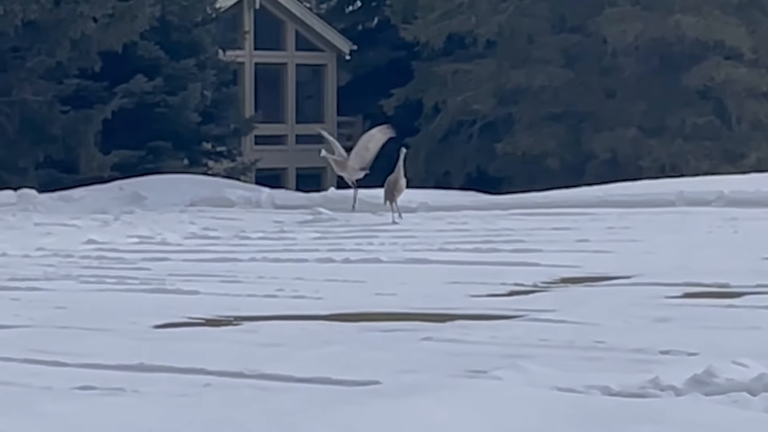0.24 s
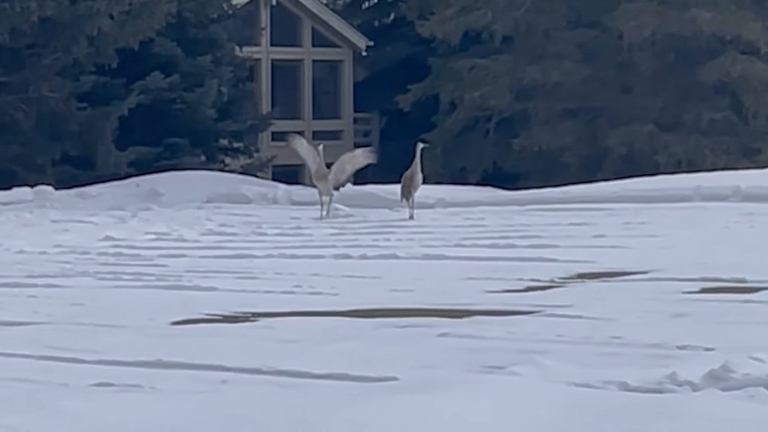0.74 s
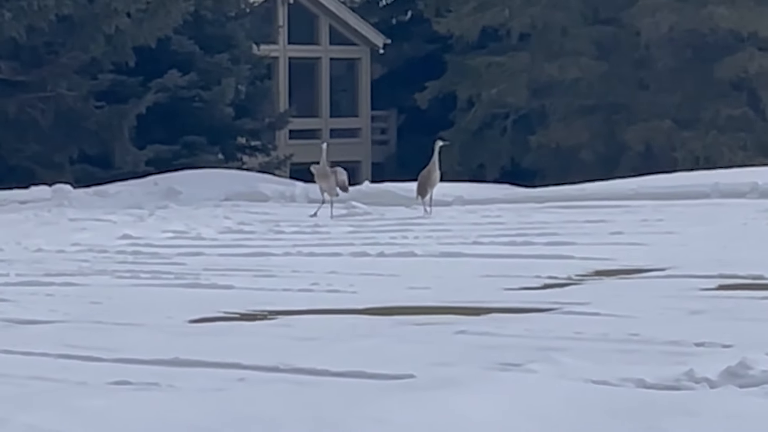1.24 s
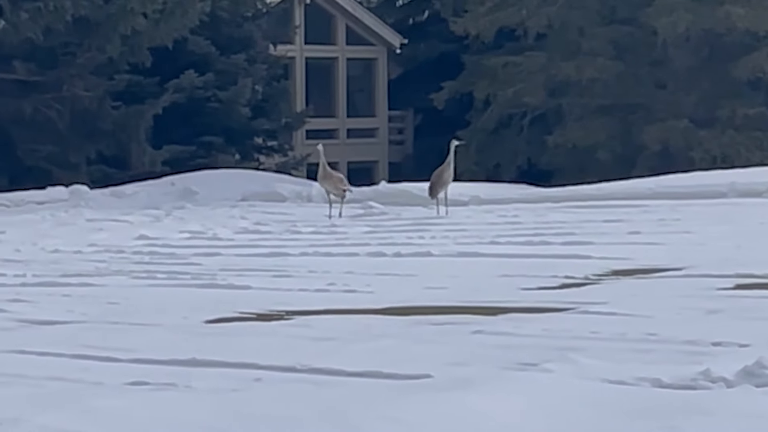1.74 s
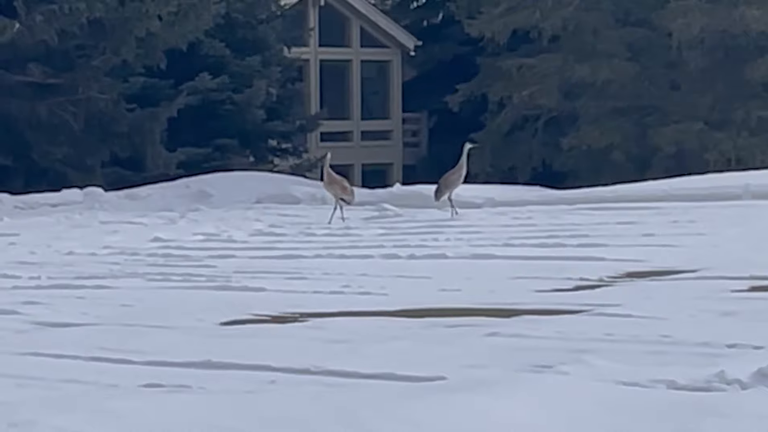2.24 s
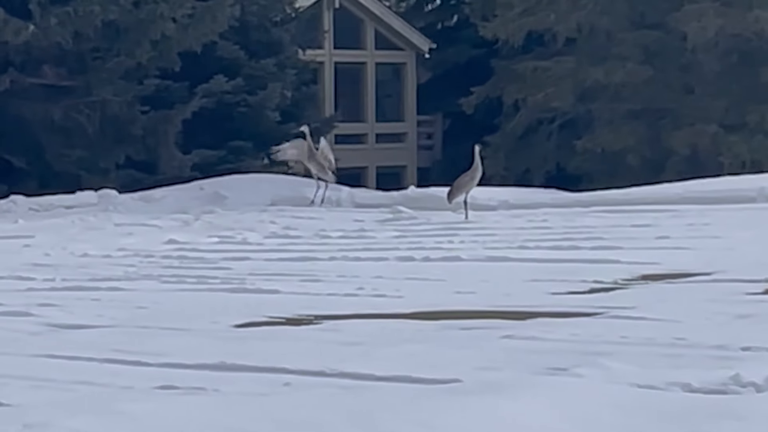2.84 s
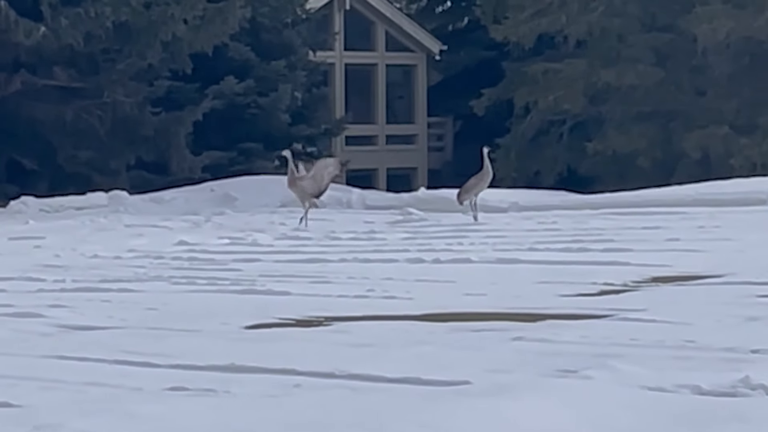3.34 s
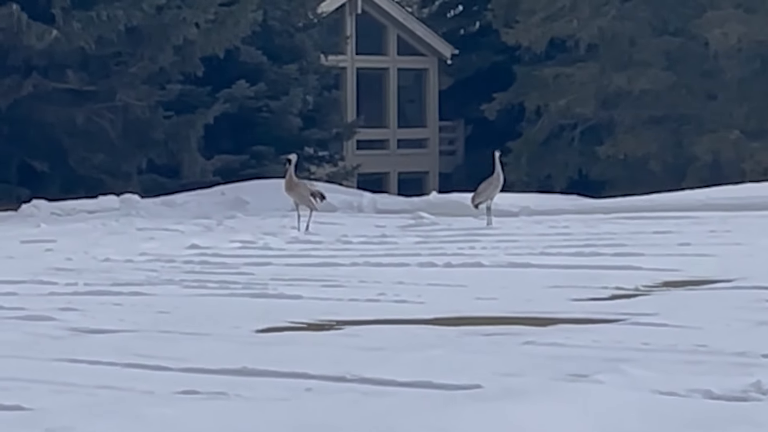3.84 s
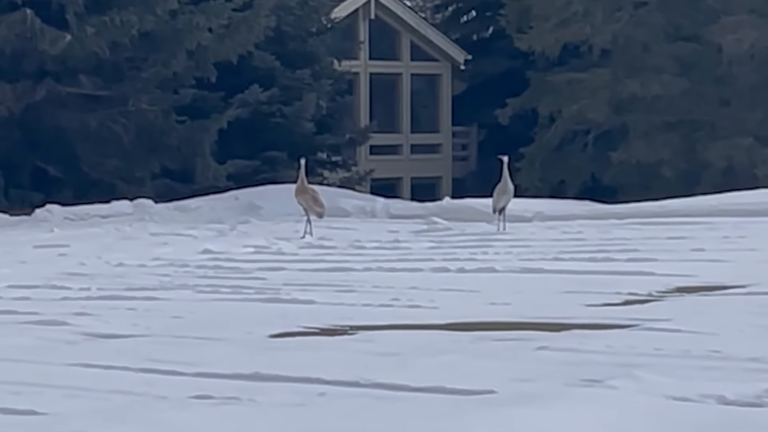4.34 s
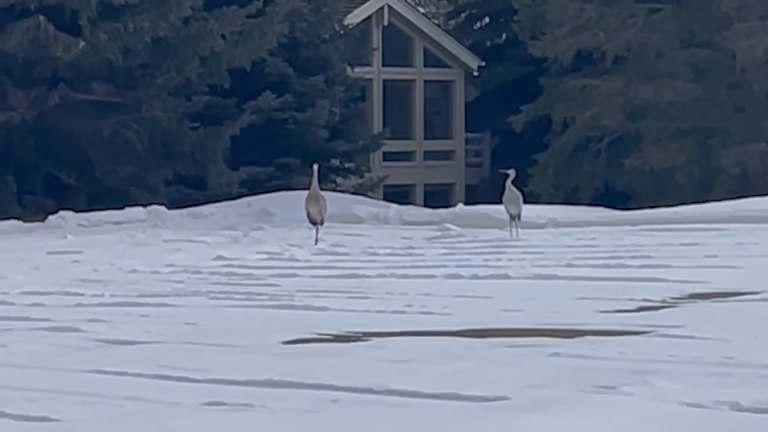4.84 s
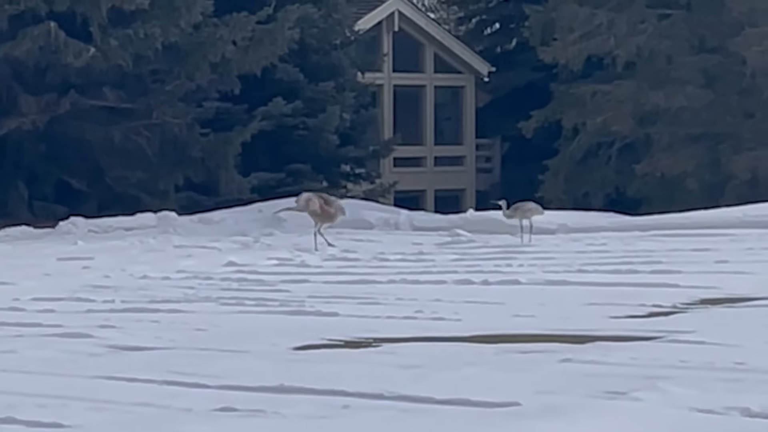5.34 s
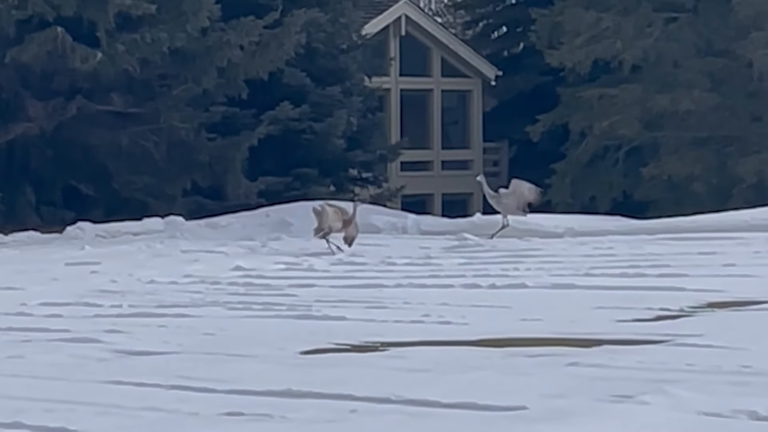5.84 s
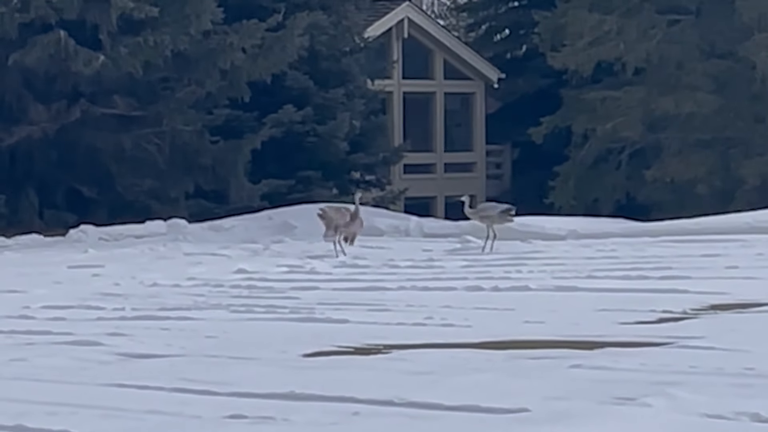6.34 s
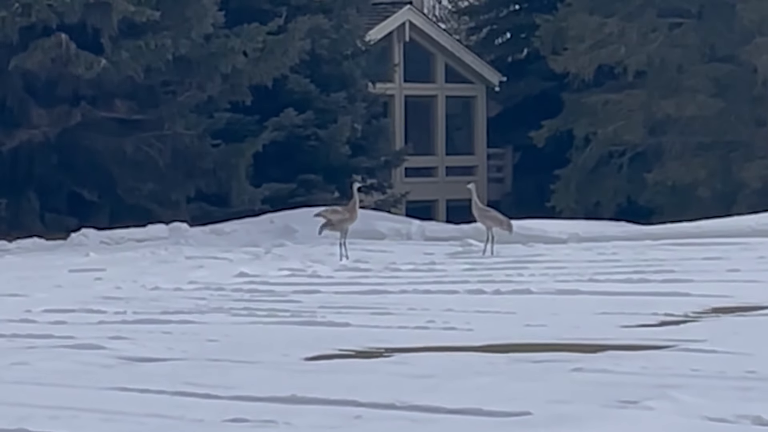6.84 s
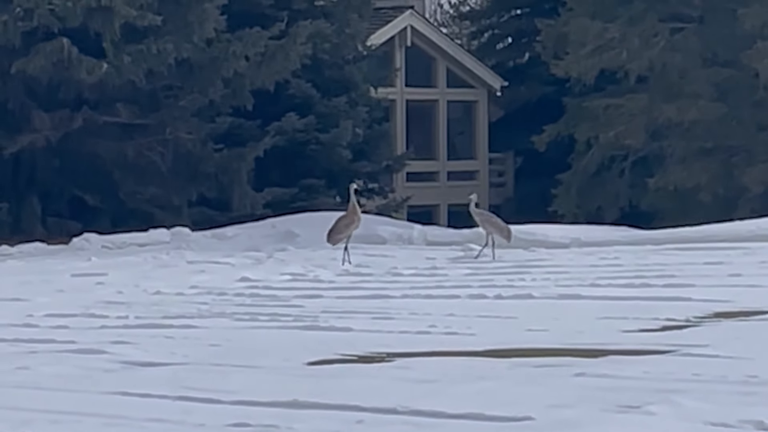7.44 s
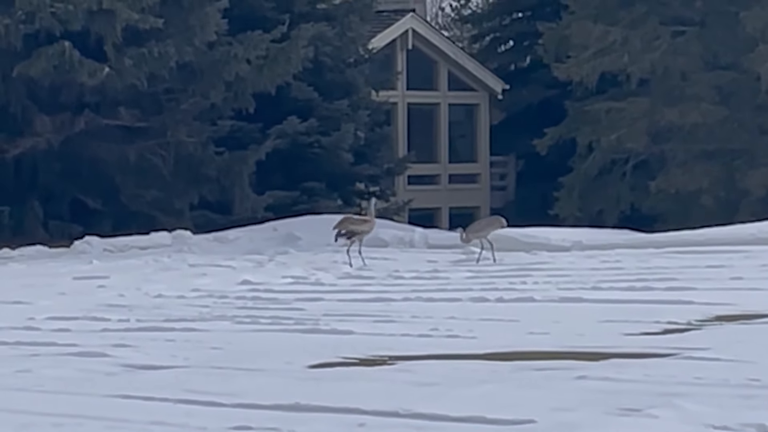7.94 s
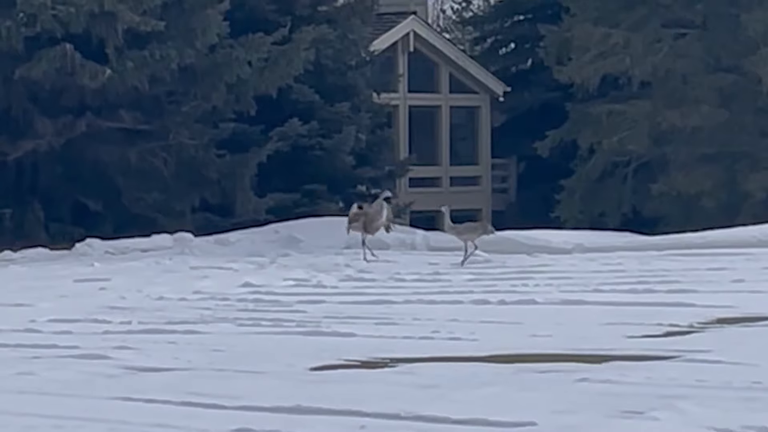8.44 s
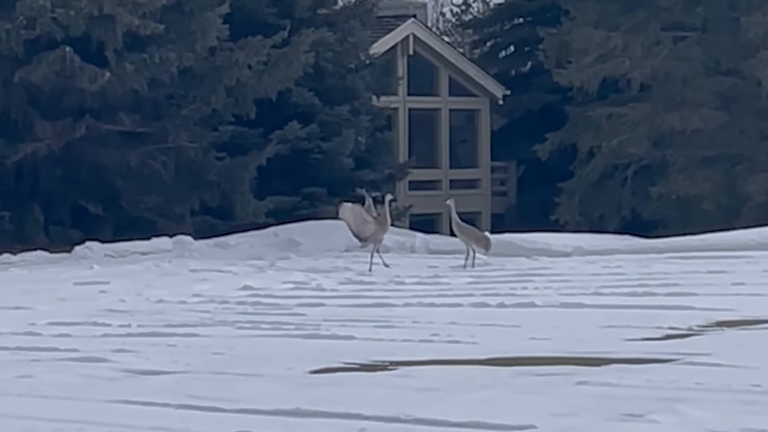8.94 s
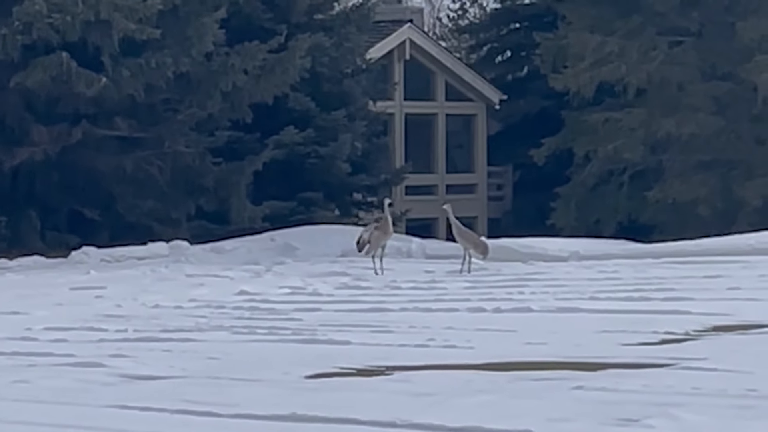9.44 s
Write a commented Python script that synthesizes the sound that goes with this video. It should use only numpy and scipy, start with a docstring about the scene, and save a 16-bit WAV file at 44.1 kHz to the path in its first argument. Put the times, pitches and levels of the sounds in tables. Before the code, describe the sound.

A pair of cranes some way off gives four fast, wooden, trumpeting rattles, the first already under way at the start. Each speeds up, then sags and fades within half a second, leaving a slap echo and a thin woodland tail. Between calls there is muffled outdoor rumble, a swelling hum, two dull soft bumps, faint thin bird whistles and a far engine that revs and drones. The handheld microphone has slightly dulled treble.

```python
"""Two sandhill cranes give four rattling duets on a snowy field; two soft notes mark the start of the last three.
One bird rolls short falling bugle notes, the other answers with lower, harsh double clacks. Each roll speeds up
and tires. Both voices are rich harmonic waves with rough air noise, shaped by throat filters and short bursts.
A house and a forest edge echo them. Behind are an outdoor rush of filtered noise, a low humming sine,
faint songbird whistles, two soft bumps, and a far engine of a few harmonics that revs up and drones on."""
import sys
import numpy as np
from scipy import signal
from scipy.fft import rfft, irfft, next_fast_len
from scipy.io import wavfile
from scipy.ndimage import uniform_filter1d

SR = 44100
rng = np.random.default_rng(int(sys.argv[2]) if len(sys.argv) > 2 else 0)


def wav_out(sig):
    """Save sig, one row per channel (or a flat mono array), as 16-bit PCM at SR to the path in sys.argv[1]."""
    wavfile.write(sys.argv[1], SR, np.round(np.clip(np.atleast_2d(sig).T, -1, 1) * 32767).astype(np.int16))


N = 427759  # length in samples, about 9.7 seconds

# Levels in dB are set before the microphone.
# Colour of the outdoor rush. Each row: frequency in Hz, gain in dB.
RUSH_COLOUR = [(20, -33), (35, -4.5), (52, 5.5), (75, 1), (150, -4), (300, -4), (550, -5), (900, -1.5),
               (1300, -9), (2000, -19), (3200, -27), (5000, -40), (7000, -48.5), (12000, -53)]
RUSH_DB = -44.5
# Deep rumble under the rush. Each row: time in seconds, gain in dB.
RUMBLE_GAIN = [(0, 0.5), (6.3, 2.5), (7.2, 1), (9.7, -9)]
# Low hum: its pitch, its resting level, and the time and level of its one swell.
HUM_HZ = 63
HUM_REST_DB, HUM_PEAK_S, HUM_PEAK_DB = -58, 3.75, -44.5
HUM_RISE_DB_PER_S, HUM_FALL_DB_PER_S = 5, 10.5

# Rolls of the lead crane. Each row: start in seconds, settled note spacing in seconds, level in dB before tiring,
# base pitch in Hz (each note glides around it), treble gain in dB at 4500 Hz, drop of the last note in dB.
BUGLE_ROLLS = [(-0.1668, .0472, -26.1, 980, -3, 11), (2.9415, .0452, -26, 1002, 5.8, 7),
               (5.7761, .047, -27.3, 992, .3, 3.5), (8.5528, .0461, -29.6, 970, -2.5, 4.5)]
# A roll starts slowly: the first gap is longer, and this lag dies away within a few notes.
BUGLE_LAG_S, BUGLE_SETTLE_NOTES = .022, 1.5
# Rolls of its mate. Each row: start in seconds, number of notes, first gap in seconds, shortening of each gap in
# seconds, level in dB before fading, starting treble gain in dB at 4500 Hz, drop of the last note in dB.
CLACK_ROLLS = [(0.0245, 7, .0634, .0038, -29.9, 2.8, 7.5), (3.1149, 9, .0729, .0052, -28.5, -1, 6),
               (5.9205, 9, .0751, .0052, -29.1, .2, 8.5), (8.7051, 7, .0756, .0066, -29.3, 0, 1.5)]
# Windpipe and bill colour of each kind of note. Each row: frequency in Hz, gain in dB.
BUGLE_THROAT = [(450, -24.5), (750, -1), (1020, -1.5), (1400, -3), (2100, -9.5), (2550, -15.5),
                (3200, -24.5), (4200, -15), (5400, -22.5), (6700, -23.5), (10000, -34.5), (13000, -38)]
CLACK_THROAT = [(380, -30), (560, -6), (730, 5), (1050, -3), (1400, -1.5), (1850, -3), (2450, -8.5),
                (3100, -7), (3900, -13), (5000, -9), (6500, -18.5), (10000, -28), (13000, -39)]
PEEP_THROAT = [(600, -11), (1250, 3.5), (1950, 0), (2500, -15), (3200, -6), (3900, -19), (4500, -13.5),
               (5500, -24.5), (7000, -34), (12000, -47)]
# Soft crane notes around the start of a roll. Each row: start in seconds, length in seconds,
# start, middle and end pitch in Hz, level in dB, roughness from 0 to 1.
PEEPS = [(2.815, 0.046, 507, 604, 572, -35.5, .2), (2.987, 0.026, 564, 579, 550, -31, 0.45),
         (5.632, 0.058, 602, 653.6, 618, -34.5, 0.28), (5.795, 0.044, 546, 555, 527, -33, .25),
         (8.419, 0.046, 587, 625, 588, -39.5, 0.35), (8.581, 0.049, 560, 574, 530, -30.5, 0.87)]
# The birds turn, so the house front catches more or less of their calls. Each row: time in seconds, gain in dB.
FACING_HOUSE = [(.3, 0.5), (3.5, 4), (6.3, -3.5), (9.0, -6)]

# Songbird slurs. Each row: start in seconds, length in seconds, start, middle and end pitch in Hz,
# level in dB before flicker.
SLURS = [(1.52, .11, 6400, 4600, 5200, -66), (1.63, 0.043, 5900, 5000, 4400, -73),
         (2.65, 0.082, 5500, 4730, 4260, -70), (2.75, 0.079, 5400, 4380, 3920, -70.5)]
# Runs of repeated songbird notes. Each row: first note in seconds, end of the run in seconds, spacing in seconds,
# start, middle and end pitch in Hz, level in dB before scatter and flicker.
SONGS = [(4.871, 5.6, .143, 2103, 2500, 2340, -67), (6.559, 8.6, 0.13, 2030, 2525, 2390, -64),
         (6.949, 7.75, 0.099, 4030, 3800, 3600, -73.5)]
# Soft low bumps. Each row: start in seconds, level in dB before the decay shape, decay in seconds.
BUMPS = [(2.331, -60, 0.041), (4.776, -41, 0.044)]

# Far engine. Each row: time in seconds, firing rate in Hz, level in dB before the exhaust colour.
ENGINE = [(2.9, 77, -62), (3.24, 75, -48.5), (3.778, 65, -42), (4.03, 102, -47.5), (4.15, 108.5, -47),
          (4.45, 107, -60), (5.0, 100, -65), (5.401, 99.5, -51.5), (6.35, 101.3, -47), (6.75, 101.5, -51.5),
          (7.048, 101, -64), (7.4, 101.3, -51.5), (8.102, 102.3, -49), (8.35, 103.2, -45.5),
          (9.1, 107, -46.5), (9.7, 109.3, -48)]
# Colour of its exhaust, with two narrow pipe resonances. Each row: frequency in Hz, gain in dB.
EXHAUST = [(65, -2), (80, 1), (102, -3), (108, -1), (140, -2), (201, -4), (207, 4), (215, -1), (300, -17.5),
           (392, -15.5), (407, -3.5), (420, -12.5)]
# Off throttle the upper harmonics are weak; they open up between these firing rates.
IDLE_HZ, OPEN_HZ, IDLE_DULL_DB = 76, 82, -17

# Left-right balance of the microphone ports. Each row: frequency in Hz, left minus right in dB.
PORT_BALANCE = [(120, 0), (350, .7), (700, 1.5), (1300, .7), (2500, .2), (5000, 0)]
# Microphone colour. Each row: frequency in Hz, gain in dB.
MIC_COLOUR = [(5500, -3.5), (6800, -7.5), (7800, -21.5), (9400, -3), (12000, -3), (14000, -23.5),
              (15500, -23)]
TOP_HZ = 15700  # the microphone passes little above this


def undb(db):
    """Turn decibels into a gain."""
    return 10 ** (np.asarray(db) / 20)


def unit(x):
    """Scale to an rms (average strength) of 1."""
    return x / np.sqrt(np.mean(x ** 2))


def clock(length_s):
    """Sample times of a short sound, in seconds."""
    return np.arange(int(length_s * SR)) / SR


def add(out, start_s, x):
    """Mix a short sound into a track."""
    i = max(int(start_s * SR), 0)
    out[i:i + len(x)] += x[:len(out) - i]


def gain_at(hz, points):
    """Read the gain from rows of Hz and dB, joined on a log-frequency axis."""
    f, db = np.transpose(points)
    return undb(np.interp(np.log(hz + 1e-3), np.log(f), db))


def colour(x, points):
    """Filter to a Hz and dB spectrum without ringing ahead of the sound, by folding its cepstrum forward."""
    size = next_fast_len(2 * len(x), real=True) // 2 * 2
    hz = np.arange(size // 2 + 1) * SR / size
    cepstrum = irfft(np.log(gain_at(hz, points)))
    cepstrum[1:size // 2] *= 2
    cepstrum[size // 2 + 1:] = 0
    response = np.exp(rfft(cepstrum))
    return irfft(rfft(x, size) * response)[:len(x)]


def wander(t, rate):
    """Random values joined by straight lines, rate of them a second."""
    grid = (t - t[0]) * rate + rng.random()
    knots = rng.standard_normal(len(t))
    return np.interp(grid, np.arange(len(knots)), knots)


def sway(hz):
    """A plain sine whose pitch follows hz."""
    return np.sin(2 * np.pi * np.cumsum(hz) / SR)


def burst(t, rise_s, fall_s):
    """Air pressure that builds quickly and runs out; its top is 1."""
    t = np.maximum(t, 0)
    shape = (1 - np.exp(-(t / rise_s) ** 2)) * np.exp(-(t / fall_s) ** 2)
    return shape / shape.max()


def rush(flutter_db=1, side_db=-21):
    """Far traffic and air in the trees: rumble, lows, middle and treble waver on their own."""
    t = np.arange(N) / SR
    bands = []
    for hz, kind in [(80, "low"), ([80, 400], "band"), ([400, 1500], "band"), (1500, "high")]:
        sos = signal.butter(2, hz, kind, fs=SR, output="sos")
        noise = signal.sosfilt(sos, rng.standard_normal(N))
        bands.append(noise * undb(flutter_db * wander(t, 11) + .5 * wander(t, 0.38)))
    deep, *upper = bands
    air = deep * undb(np.interp(t, *np.transpose(RUMBLE_GAIN))) + sum(upper)
    # opposite in the two channels, so the rush sounds wide
    side = colour(rng.standard_normal(N), [(60, -16.0), (300, 4.5), (1200, 7), (5000, 4.5)]) * undb(side_db)
    stereo = np.array([colour(air + side, RUSH_COLOUR), colour(air - side, RUSH_COLOUR)])
    return unit(stereo) * undb(RUSH_DB)


def hum(waver=0.012):
    """A low sine, slightly wavering in pitch, that swells and sinks back."""
    t = np.arange(N) / SR
    rising = HUM_RISE_DB_PER_S * (HUM_PEAK_S - t)
    falling = HUM_FALL_DB_PER_S * (t - HUM_PEAK_S)
    db = np.maximum(HUM_PEAK_DB - np.maximum(rising, falling), HUM_REST_DB)
    return np.sqrt(2) * undb(db) * sway(HUM_HZ * (1 + waver * wander(t, 4.2)))


def syrinx(hz, rasp):
    """A harmonic wave from swinging membranes, and a puff of air noise each cycle that blurs the upper harmonics."""
    phase = 2 * np.pi * np.cumsum(hz) / SR
    k = np.arange(1, 25)[:, None]  # harmonic numbers
    lags = 2 * np.pi * rng.random(k.shape)  # the long coiled windpipe delays each harmonic differently
    audible = k * hz < SR / 2
    wave = unit(np.sum(np.cos(k * phase - lags) * audible, axis=0))
    air = unit((1 + np.cos(phase)) * rng.standard_normal(len(hz)))
    wave = colour(wave, [(2100, 0), (4000, -8 * rasp)])
    return wave + rasp * colour(air, [(1000, -4), (2000, -2), (3500, 2)])


def brighten(x, treble_db):
    """A harder push lifts the upper harmonics, the highest most."""
    return colour(x, [(1700, 0.019), (4500, treble_db), (12000, 1.9 * treble_db)])


def bugle_notes(count=7, tiring_power=5.5, sag_hz_per_db=10.0, first_dull_db=3.5, scatter_db=0.75, scatter_hz=14):
    """A roll speeds up to a steady beat and brightens; as the breath runs out its notes sink in level and pitch."""
    k = np.arange(count)
    lag = np.exp(-k / BUGLE_SETTLE_NOTES)
    for start_s, gap_s, db, hz, treble_db, drop_db in BUGLE_ROLLS:
        gaps = gap_s + BUGLE_LAG_S * lag
        times = start_s + np.cumsum(gaps) - gaps
        tired_db = drop_db * (k / k[-1]) ** tiring_power
        levels = db - tired_db + scatter_db * rng.standard_normal(count)
        pitches = hz - sag_hz_per_db * tired_db + scatter_hz * rng.standard_normal(count)
        yield from zip(times, levels, pitches, treble_db - first_dull_db * lag)


def bugles(rise_s=0.0034, fall_s=0.0082, jitter=.03, opening_db=-17, closing_db=-12, closing_s=0.012, lead_s=.0022):
    """Each note flutters open, swings a dozen cycles that sag in pitch, then breaks up as the membranes close."""
    opening_s, rasp = .006, .45
    out, t = np.zeros(N), clock(.06) - opening_s
    for s, db, hz, treble_db in bugle_notes():
        if s < 0:  # the first roll is already under way
            continue
        sag = .73 + .38 * np.exp(-np.maximum(t, 0) / .017)
        pitch = hz * (sag + jitter * wander(t, 965))
        opening = undb(opening_db) * syrinx(pitch, 1) * burst(t + opening_s, 0.001, 0.011)
        voice = syrinx(pitch, rasp) * burst(t, rise_s, fall_s)
        # as the push ends only the round fundamental swings on
        ring = .15 * np.cos(2 * np.pi * np.cumsum(pitch) / SR) * burst(t, .005, .012)
        broken_pitch = pitch * (1 + 0.12 * wander(t, 600))
        closing = undb(closing_db) * syrinx(broken_pitch, 0.94) * burst(t - closing_s, 0.002, 0.0069)
        note = brighten(colour(opening + voice + ring + closing, BUGLE_THROAT), treble_db)
        add(out, s - lead_s - opening_s, unit(note) * undb(db))
    return out


def clack_notes(fade_db_per_note=0.64, harden_db_per_note=0.12, tiring_power=8, second_db=-3, second_scatter_db=1.0):
    """The answering roll quickens evenly, fades and hardens, then gives out; the second burst varies by note."""
    for start_s, count, gap_s, quicken_s, db, treble_db, drop_db in CLACK_ROLLS:
        k = np.arange(count)
        gaps = gap_s - quicken_s * k
        times = start_s + np.cumsum(gaps) - gaps
        levels = db - fade_db_per_note * k - drop_db * (k / k[-1]) ** tiring_power
        seconds_db = second_db + second_scatter_db * rng.standard_normal(count)
        yield from zip(times, levels, treble_db + harden_db_per_note * k, seconds_db)


def clacks(rasp=1.0, jitter=.05, rise_s=0.0017, first_s=0.0057, second_s=0.012, gap_s=0.0069, lead_s=.0014):
    """The membranes snap open, swing low for a few cycles, then rattle shut in a second, rougher burst."""
    gap_scatter_s = .0013
    out, t = np.zeros(N), clock(.05)
    for s, db, treble_db, second_db in clack_notes():
        detune = 1 + 0.055 * rng.standard_normal() + jitter * wander(t, 930)
        pitch = (680 + 260 * np.exp(-t / 0.00379)) * detune
        snap = syrinx(pitch, rasp) * burst(t, rise_s, first_s)
        ring = 0.13 * np.cos(2 * np.pi * np.cumsum(pitch) / SR) * burst(t, 0.003, 0.014)
        rattle = syrinx(590 * (1 + 0.113 * wander(t, 511)), 0.96)
        second_start_s = gap_s + gap_scatter_s * rng.standard_normal()
        rattle = rattle * burst(t - second_start_s, 0.0019, second_s)
        rattle = colour(rattle * undb(5.2 * wander(t, 227)), [(700, -3.5), (1700, 4.5), (4500, -5)])
        note = brighten(colour(snap + ring + undb(second_db) * rattle, CLACK_THROAT), treble_db)
        add(out, s - lead_s, unit(note) * undb(db))
    return out


def surroundings(x, house_s=.108, house_db=-17, near_db=-15.5, near_s=0.014, forest_db=-20.5,
                 forest_t60_s=1.32, patchy_db=4):
    """Scatter from the snow banks, one slap from the house front and a thin, uneven tail from the trees."""
    t = clock(1.2)
    scatter, slap, trees = rng.standard_normal((3, len(t)))
    near = scatter * np.exp(-t / near_s) * (t > .004)
    near = colour(near, [(900, -1), (3000, 1.5), (5000, 4), (10000, 1)])
    house = slap * burst(t - house_s, 0.00083, 0.004)
    house = colour(house, [(900, -5.5), (1800, 1), (3300, 2.5), (5000, -4.5), (10000, -10.5)])
    # the tail builds up softly, then falls 60 dB in forest_t60_s
    tail = (1 - np.exp(-t / 0.038)) * undb(-60 * t / forest_t60_s)
    trees = trees * undb(patchy_db * wander(t, 90)) * tail
    forest = colour(trees, [(700, -0.5), (3500, -9.0), (6000, -12.5), (10000, -16.5)])
    parts = [(near, near_db), (house, house_db), (forest, forest_db)]
    near, house, forest = (undb(db) * part / np.linalg.norm(part) for part, db in parts)
    facing = undb(np.interp(np.arange(N) / SR, *np.transpose(FACING_HOUSE)))
    return (signal.fftconvolve(x, near + forest) + signal.fftconvolve(x * facing, house))[:N]


def arch(length_s, start_hz, middle_hz, end_hz):
    """A curved pitch through three points, and a swell with soft ends."""
    u = clock(length_s) / length_s
    hz = np.polyval(np.polyfit([0, .5, 1], [start_hz, middle_hz, end_hz], 2), u)
    return hz, np.sqrt(np.sin(np.pi * u ** 1.62))


def songbirds(note_s=0.062):
    """Thin, flickering whistles from the trees: sines that glide in pitch."""
    out, notes = np.zeros(N), list(SLURS)
    for first, last, spacing, start_hz, middle_hz, end_hz, db in SONGS:
        for s in np.arange(first, last, spacing):
            note_start = s + .006 * rng.standard_normal()
            notes.append((note_start, note_s, start_hz, middle_hz, end_hz, db + rng.standard_normal()))
    for s, length_s, start_hz, middle_hz, end_hz, db in notes:
        hz, swell = arch(length_s, start_hz, middle_hz, end_hz)
        add(out, s, unit(swell * sway(hz)) * undb(db))
    flicker_db = 5 * wander(np.arange(N) / SR, 110) - 5.5
    return out * undb(flicker_db)


def bumps():
    """Two dull, soft bumps of low noise that die away."""
    out, t = np.zeros(N), clock(.25)
    thud_colour = [(30, 1), (70, -5.0), (150, 0.0), (450, -5), (1200, -64), (4000, -73)]
    for s, db, decay_s in BUMPS:
        thud = colour(rng.standard_normal(len(t)), thud_colour)
        add(out, s, unit(thud) * burst(t, .004, decay_s) * undb(db))
    return out


def engine(waver=0.00702, flutter_db=2, count=4):
    """A far engine idles, revs up and drones; its lowest harmonics swell as they cross the exhaust's resonances."""
    t = np.arange(N) / SR
    s, *columns = np.transpose(ENGINE)
    # smooth the rate and level over a tenth of a second
    hz, db = (uniform_filter1d(np.interp(t, s, c), size=SR // 10) for c in columns)
    phase = 2 * np.pi * np.cumsum(hz * (1 + waver * wander(t, 14))) / SR
    entry = np.clip(1 + (t - s[0]) / .3, 0, 1)  # fades in before the first row
    throttle = undb(np.interp(hz, [IDLE_HZ, OPEN_HZ], [IDLE_DULL_DB, 0]))
    harmonics = []
    for k in range(1, count + 1):
        level = gain_at(k * hz, EXHAUST) * undb(flutter_db * wander(t, 9))
        harmonics.append(level * np.sin(k * phase))
    first, *upper = harmonics
    return entry * np.sqrt(2) * undb(db) * (first + throttle * sum(upper))


def peeps(jitter=0.073, flutter_db=6):
    """On gentle air the syrinx swings evenly, on a harder push it breaks up; a note brightens as it swells."""
    out = np.zeros(N)
    for s, length_s, start_hz, middle_hz, end_hz, db, rough in PEEPS:
        t = clock(length_s)
        hz, swell = arch(length_s, start_hz, middle_hz, end_hz)
        shaky_hz = hz * (1 + jitter * rough ** 2 * wander(t, 460))
        voice = syrinx(shaky_hz, rough) * undb(flutter_db * rough * wander(t, 200))
        voice = colour(voice, PEEP_THROAT)
        dull = brighten(voice, -7.0)
        note = swell * (dull + swell ** 2 * (voice - dull))
        add(out, s, unit(note) * undb(db))
    return out


def scene(port_lag_s=3.5e-5, spread_db=-2):
    """All sound leans slightly left, reaching the left port a moment sooner; echoes also come from the sides."""
    calls, small_birds = bugles() + clacks() + peeps(), songbirds()
    in_trees = small_birds + surroundings(small_birds, house_db=-36, near_db=-12, forest_db=-16)
    ahead = calls + surroundings(calls) + in_trees + engine() + hum() + bumps()
    wide = colour(surroundings(calls), [(700, -17.5), (3000, -14), (9000, -3.5)]) * undb(spread_db)
    spectrum = rfft(ahead + np.array([wide, -wide]) + rush(), 2 ** 19)
    hz = np.linspace(0, SR / 2, spectrum.shape[1])
    lead = np.minimum(2 * np.pi * hz * port_lag_s, np.pi / 2)  # radians, at most a quarter cycle
    # half of the difference goes to each channel
    lean = np.sqrt(gain_at(hz, PORT_BALANCE)) * np.exp(.5j * lead)
    return irfft(spectrum * np.array([lean, 1 / lean]))[:, :N]


def record(dry):
    """The microphone's ports notch the treble, and a steep low-pass filter cuts the top."""
    coloured = np.array([colour(channel, MIC_COLOUR) for channel in dry])
    return signal.sosfilt(signal.ellip(8, .2, 70, TOP_HZ, fs=SR, output="sos"), coloured)


dry = scene()
out = record(dry)
wav_out(out)
```